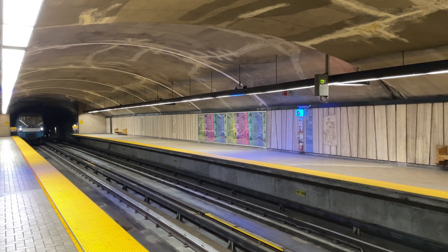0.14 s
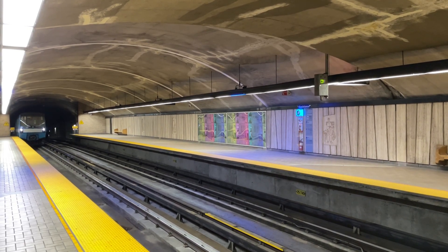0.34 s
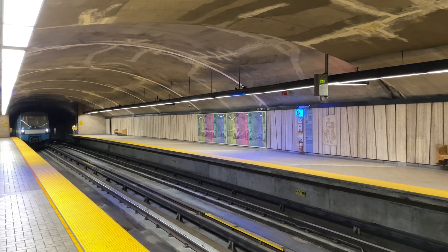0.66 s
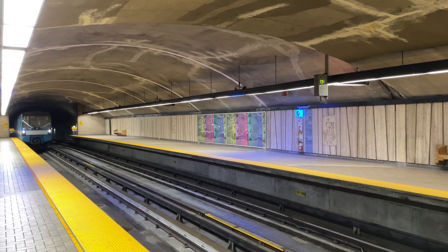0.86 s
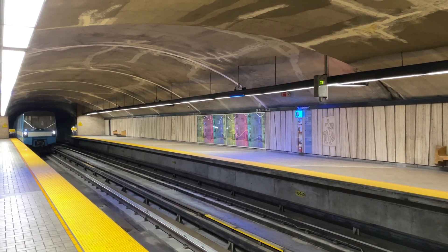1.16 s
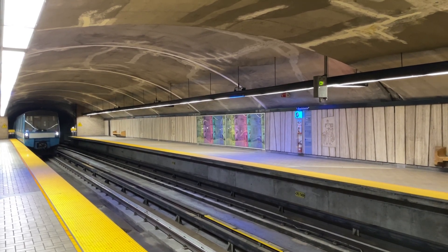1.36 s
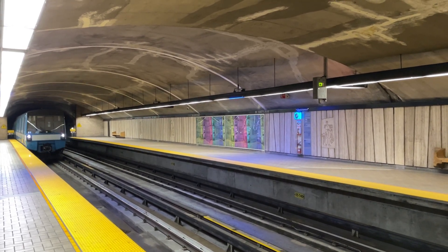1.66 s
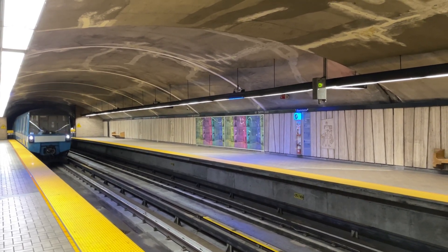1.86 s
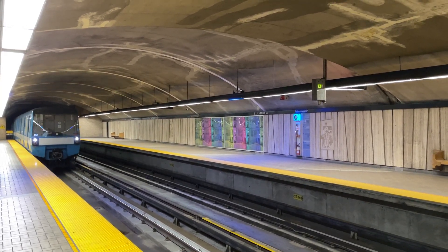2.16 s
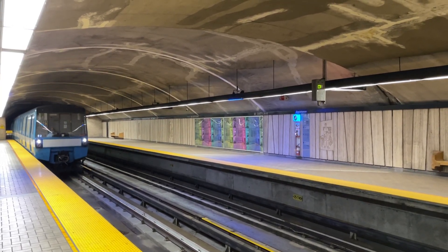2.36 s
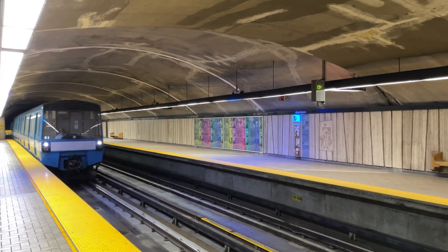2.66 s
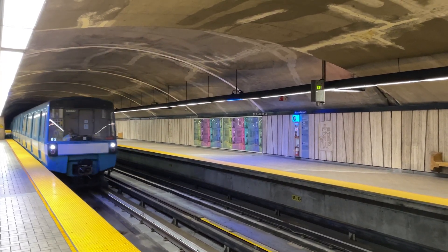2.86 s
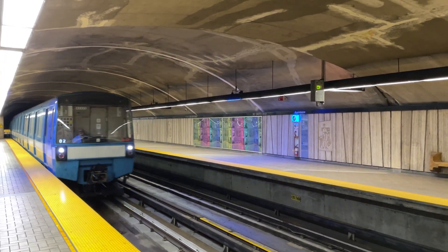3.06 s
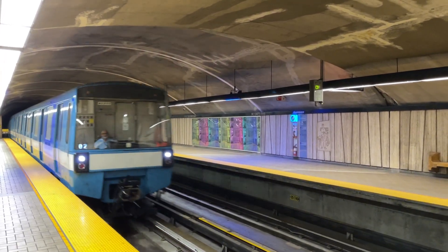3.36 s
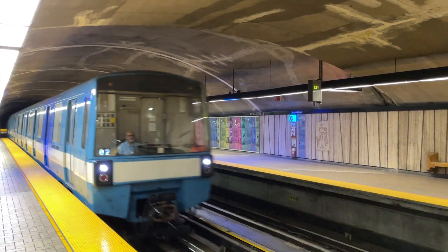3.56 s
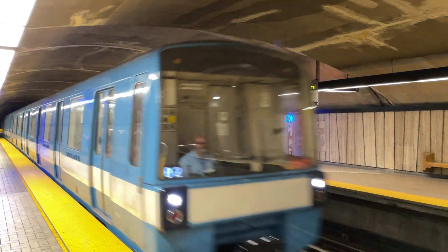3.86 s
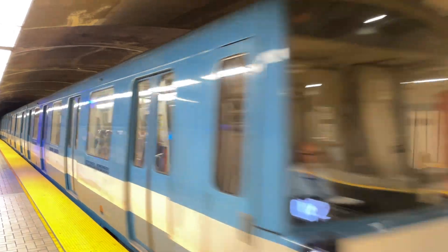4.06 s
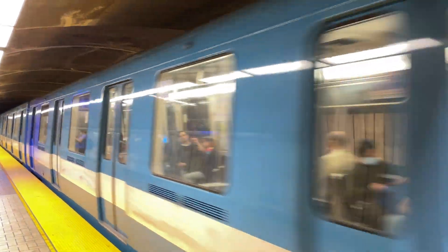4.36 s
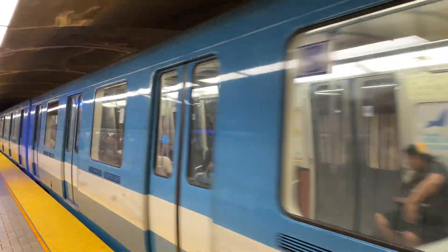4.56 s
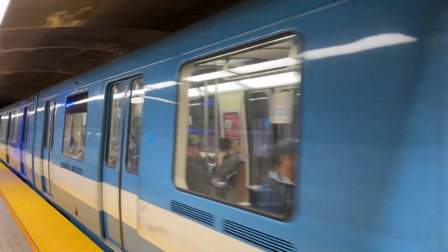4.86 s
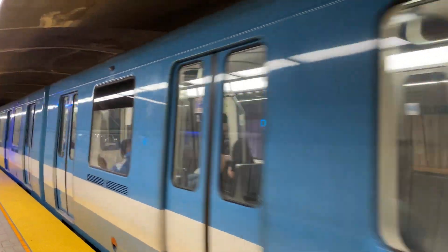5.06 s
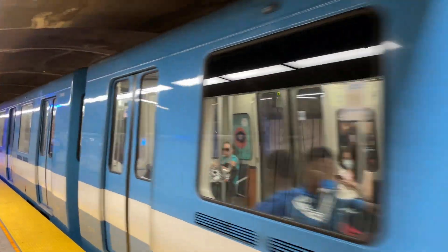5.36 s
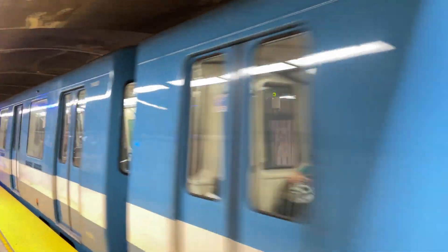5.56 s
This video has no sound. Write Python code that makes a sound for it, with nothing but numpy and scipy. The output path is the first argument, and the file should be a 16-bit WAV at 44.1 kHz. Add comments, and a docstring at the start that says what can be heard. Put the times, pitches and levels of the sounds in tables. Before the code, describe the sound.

A rubber-tyred metro train runs into a vaulted underground station, heard in stereo from the platform edge. From 0 s a loud, steady tyre roar and low rumble boom out of the tunnel, opening slightly by 0.9 s as the train emerges. Reverberant resonances colour it, and brief tonal swells and low surges make it uneven through about 3.6 s. A blurred gear note near 400 Hz slowly sinks and recedes around 3 s, beside a lower tyre hum and faint motor harmonics. Short, faint rail singing appears now and then. Sliding contact shoes hiss, their sizzle brightening until about 4.3 s. Near 3.9 s the nose passes: car bodies screen the distant roar, slipstream gently buffets the microphone, and a hollow resonance rises and fades. Soft bogie booms pass at 3.85, 4.5 and, strongest, 5.3 s, with slight floor shake. The train is still rolling at the end.

```python
"""Tyre roar booms out of a tunnel over singing gears: a rubber-tyred metro train runs into a vaulted station.
Heard from the platform edge, coloured noise makes the roar, and gliding narrow bands make the hall's resonances,
the slowly falling gear note and the faint drive hum. The collector shoes hiss ever brighter as they near.
Around 4 s the car bodies screen the far roar and their slipstream brushes the microphone; the last of three
bogies booms past at 5.3 s."""
import sys
import numpy as np
from scipy import signal
from scipy.fft import next_fast_len
from scipy.io import wavfile
from scipy.ndimage import uniform_filter1d

SR = 44100
rng = np.random.default_rng(int(sys.argv[2]) if len(sys.argv) > 2 else 0)


def persist_wave(psi):
    """Save psi, clipped to +-1, as 16-bit WAV."""
    counts = np.round(np.clip(psi, -1, 1) * 32767).astype(np.int16)
    wavfile.write(sys.argv[1], SR, np.atleast_2d(counts).T)


N = 251811
TIME = np.arange(N) / SR
FREQS = np.maximum(np.arange(N // 2 + 1) * SR / N, 1)

# Bogies that roll by right below the platform edge.
# Each row: time in seconds, boom in dB, floor shake in dB, spread of the bell-shaped swell in seconds.
BOGIES = [(3.85, -27.5, -32, 0.083), (4.5, -32, -35, 0.14), (5.332, -23.5, -29, 0.1)]
BRIGHTEST_S = 4.33   # the sizzle stops brightening and the rising hollow resonance is loudest
CHANGES_PER_S = 7   # random level changes of tyres and slipstream


def from_db(db):
    """Decibels to gain."""
    return 10 ** (np.asarray(db) / 20)


def over_pitch(rows):
    """Each column of a spectrum table, at every frequency."""
    hz, *columns = np.transpose(rows)
    return [np.interp(np.log(FREQS), np.log(hz), column) for column in columns]


def stage(middle_s, length_s):
    """A smooth change from 0 to 1."""
    return .5 + .5 * np.sin(np.pi * np.clip((TIME - middle_s) / length_s, -.5, .5))


def swell(at_s, spread_s):
    """A bell-shaped rise and fall of height 1."""
    return np.exp(-.5 * ((TIME - at_s) / spread_s) ** 2)


def drift(rate):
    """Slow chance of spread 1 at its knots, with `rate` knots a second."""
    knots = rng.standard_normal(2000)
    return np.interp(TIME * rate, np.arange(len(knots)), knots)


def port_mix(focus):
    """How much shared and private sound each microphone port takes; focus 1 is ahead, 0 is from all around."""
    # Each row: frequency in Hz, likeness 0-1 at full focus, left minus right in dB, left's lead in radians.
    port_rows = [(80, .98, -.4, 0), (125, .97, -.8, .03), (175, .92, -.7, .08), (330, .8, 0, .25),
                 (600, .4, 1.6, .45), (1200, .41, 1.5, .1), (1900, .24, 2.3, 0), (3100, .48, 3.6, .7),
                 (4400, .57, 3.4, .15), (5100, .49, 4.2, .6), (6100, .65, 2.2, -.3), (7000, .72, 1.5, -1.5),
                 (7900, .98, 0, -2.9), (8600, .98, 0, -3.4), (9800, .7, 0, -4.7), (11200, .85, 0, -6.28),
                 (13500, .75, 0, -7.6)]
    alike, pan_db, lead = over_pitch(port_rows)
    alike = np.clip(focus * alike, 0, .99)
    sides = np.array([[.5], [-.5]])   # left, right
    port = from_db(sides * pan_db) * np.exp(1j * sides * lead)
    return port * np.sqrt(alike), port * np.sqrt(1 - alike)


def hall_noise(gain, ports):
    """Reverberant stereo noise of a given colour, as an analytic signal with unit power in the middle."""
    size = next_fast_len(N)
    bins = np.minimum(np.arange(size // 2) * N // size, N // 2)
    white = rng.standard_normal((3, size // 2)) + 1j * rng.standard_normal((3, size // 2))
    shared, private = ports
    spectrum = gain[bins] * (shared[:, bins] * white[0] + private[:, bins] * white[1:])
    noise = np.fft.ifft(spectrum, size)[:, :N]
    return noise / np.std(noise.real.mean(axis=0))


def broadband(spectrum, ports):
    """Hall noise that follows a spectrum table and falls away steeply beyond its ends."""
    low_hz, high_hz = spectrum[0][0], spectrum[-1][0]
    ends = np.minimum(1, np.minimum(FREQS / low_hz, high_hz / FREQS)) ** 4
    return hall_noise(ends * from_db(over_pitch(spectrum)[0]), ports).real


def resonance(hz, width_hz):
    """Gain of a resonance, down to a third at width_hz to either side."""
    return 1 / (1 + ((FREQS - hz) / width_hz) ** 2 * 2)


def steadied(x, seconds, share):
    """Even out a share of the slow swells of a sound."""
    power = uniform_filter1d(np.mean(x ** 2, axis=0), max(int(seconds * SR), 1))
    relative_power = np.maximum(power / power.mean(), 1e-6)
    return x * relative_power ** (-np.clip(share, 0, 1) / 2)


def gliding_band(centre_hz, offset_hz, width_hz, ports):
    """A narrow band of hall noise whose pitch slides by a changing offset."""
    glide = np.exp(2j * np.pi * np.cumsum(offset_hz) / SR)
    return (hall_noise(resonance(centre_hz, width_hz), ports) * glide).real


def smeared_note(hz, ports, width_hz):
    """A tone smeared by the hall: a narrow band that glides with the pitch, held at a steady level."""
    note = gliding_band(hz.mean(), hz - hz.mean(), width_hz, ports)
    return steadied(note, seconds=0.21, share=1.0)


def clean_note(hz, wander_hz, waver_db):
    """One near source sings a line that wanders and wavers; the hall shifts its phase at each port."""
    phase = 2 * np.pi * np.cumsum(hz + wander_hz * drift(rate=9)) / SR
    at_ports = phase + 0.39 * np.array([drift(rate=5), drift(rate=5)])
    return np.sqrt(2) * from_db(waver_db * drift(rate=6.16)) * np.cos(at_ports)


def narrow_swells(rows, wander_hz):
    """Wandering tones that each rise and fall once."""
    return sum(from_db(level_db) * swell(at, spread_s) * clean_note(hz, wander_hz, waver_db=2)
               for at, hz, level_db, spread_s in rows)


def tyres(ports, arrived):
    """Many wheels roll: the underbody shakes and the casings drum, each varying a little at random."""
    # Underbody rumble, then tyre drumming. Each row: frequency in Hz, relative level in dB per Hz.
    rumble_spectrum = [(15, -28), (30, -20), (45, -4), (65, 0.5), (90, 2), (120, -4), (180, -10),
                       (400, -67)]
    drum_spectrum = [(50, -43), (90, -8.5), (130, -0.5), (200, -2.5), (300, -3), (400, -11.5), (600, -17.5),
                     (1200, -63.5)]
    # level far off, change alongside, random variation
    rumble_db = -30 + 0.9 * arrived + 1 * drift(CHANGES_PER_S)
    drum_db = -23.5 - 2 * arrived + 0.6 * drift(CHANGES_PER_S)
    rumble = from_db(rumble_db) * steadied(broadband(rumble_spectrum, ports), seconds=0.19, share=1.0)
    drum = from_db(drum_db) * steadied(broadband(drum_spectrum, ports), seconds=0.17, share=0.98)
    return rumble + drum


def early_echoes(x, arrived):
    """Floor and wall echo paths lengthen as the train nears, so faint ripples slide down the spectrum."""
    # Each row: delay in ms with the train far off, delay in ms with it alongside, level in dB.
    echo_rows = [(4.1, 5.5, -31.5), (8.3, 11, -17.5), (17, 21, -20)]
    out = x
    for far_ms, near_ms, echo_db in echo_rows:
        late_s = (far_ms + (near_ms - far_ms) * arrived) / 1000
        out = out + from_db(echo_db) * np.array([np.interp(TIME - late_s, TIME, side) for side in x])
    return out


def treads(ports, arrived, emerged, screened):
    """Tread roar comes down the hall at first, then more and more from all along the platform gap."""
    # Roar from ahead, then out of the gap between car and platform.
    # Each row: frequency in Hz, relative level in dB per Hz.
    roar_spectrum = [(120, -28), (250, -11), (370, 1.5), (490, 0), (570, -1.5), (680, 0), (950, -2.5),
                     (1150, -4), (1400, -7), (1750, -9.5), (2100, -12.5), (2800, -18.5), (4000, -33),
                     (8000, -66)]
    gap_spectrum = [(200, 1), (400, 2), (550, 4), (700, 3.5), (900, 6), (1150, 0), (1500, 3.5),
                    (1850, -3.5), (2200, -5), (3000, -21), (5000, -44)]
    # level from the tunnel, gain out of it, loss behind the car bodies
    roar_db = -21 + 0.91 * emerged - 1.84 * screened
    ahead = steadied(broadband(roar_spectrum, ports), seconds=0.17, share=0.39)
    beside = steadied(broadband(gap_spectrum, port_mix(focus=0.078)), seconds=0.14, share=.5)
    beside_share = np.clip(0.26 * arrived ** 2, 0, 1)
    roar = np.sqrt(1 - beside_share) * ahead + np.sqrt(beside_share) * beside
    flutter_db = 0.17 * drift(rate=24)   # the running surface is not quite even
    return from_db(roar_db + flutter_db) * early_echoes(roar, arrived)


def vault(ports, in_hall, screened):
    """Rolling noise rings the tunnel's, then the hall's sliding resonances, until the car bodies screen them."""
    # Each row: frequency in Hz at mid-run, glide in Hz per s, width in Hz, then levels in dB before the
    # common trim: train in the tunnel, out in the hall, alongside.
    resonances = [(120, -7, 44, -29, -30, -41), (155, -9, 44, -27, -35, -41.5),
                  (267, 0, 42, -31, -33.5, -31), (442, 0, 40, -28, -41, -40),
                  (474, -5, 52, -30, -30, -37.5), (640, -5, 47, -34, -32.5, -36),
                  (734, -5, 46, -28.5, -29.5, -36), (778, -36, 83, -30, -32.5, -36),
                  (922, 10, 56, -34, -40, -38.5), (1265, -28, 98, -33, -36, -44)]
    trim_db = -2.5
    out = 0
    for hz, glide_hz_per_s, width_hz, tunnel_db, hall_db, near_db in resonances:
        band = gliding_band(hz, glide_hz_per_s * (TIME - TIME.mean()), width_hz, ports)
        ringing = steadied(band, seconds=0.23, share=0.53)
        far_db = tunnel_db + (hall_db - tunnel_db) * in_hall
        level_db = far_db + (near_db - far_db) * screened + trim_db
        out = out + from_db(level_db) * ringing
    return out


def gears(ports):
    """All bogies' gears mesh at nearly one rate, sinking as the train brakes; the nearest stand out as a line."""
    hz = 398.6 - 9.7 * TIME   # falls by 9.7 Hz per s
    faded = stage(middle_s=2.9, length_s=1)   # the gear note recedes
    line = from_db(-32.5 - 12 * faded) * clean_note(hz, wander_hz=4.99, waver_db=2)
    many = from_db(-30.5 - 2 * faded) * smeared_note(hz, ports, width_hz=35)
    return line + many


def tyre_hum(ports, in_hall, screened, second_car):
    """Turning tyres hum, louder in the hall and sinking with the speed; the nearest stand out as a line."""
    hz = 266.3 - 3.2 * TIME   # falls by 3.2 Hz per s
    # level, gain in the hall, loss behind the car bodies, gain from the second car
    hum_db = -33.5 + 2.5 * in_hall - 2.5 * screened + 5 * second_car
    line_db = -37 + 3.5 * in_hall - 5.5 * screened
    many = from_db(hum_db) * smeared_note(hz, ports, width_hz=32)
    return many + from_db(line_db) * clean_note(hz, wander_hz=5.02, waver_db=2)


def drive(ports):
    """The switched motor current hums on a few harmonics."""
    # Each row: multiple of the base pitch, level in dB.
    partials = [(2, -43.5), (3, -44.5), (4, -50), (5, -48)]
    hz = 368.3 - .9 * TIME   # falls by 0.9 Hz per s
    return sum(from_db(level_db) * smeared_note(k * hz, ports, width_hz=5.5 * k) for k, level_db in partials)


def shoes(ports, emerged, screened, second_car):
    """Shoes slide on the steel rails; the air lets their finest sizzle through only from close by."""
    # Hiss, sizzle and its finest part. Each row: frequency in Hz, relative level in dB per Hz.
    hiss_spectrum = [(1000, -23), (2000, -2), (3000, 3), (4000, 1), (5000, -0.5), (6000, -4), (7500, -11),
                     (10000, -98), (14000, -47)]
    sizzle_spectrum = [(4000, -22), (6500, -3), (7800, 3), (9000, .3), (10200, -2.5), (11500, -9.5),
                       (13000, -20)]
    fine_spectrum = [(8800, -8), (9400, 2), (11200, -.5), (14000, -11)]
    speed_m_per_s = 17.3
    air_db_per_m, fine_air_db_per_m = -0.1072, -0.09   # the finest part loses both
    distance_m = speed_m_per_s * np.maximum(BRIGHTEST_S - TIME, 0)
    at_bogie = sum(swell(at, spread_s) for at, _, _, spread_s in BOGIES)

    # level from the tunnel, gain out of it, then loss behind the car bodies and gain as a bogie passes
    hiss_db = -37.1 + 1.72 * emerged + screened * (-0.7 + 0.2 * at_bogie)
    # level close by, loss in the tunnel, loss in the air
    sizzle_db = -50 - 1 * (1 - emerged) + air_db_per_m * distance_m
    sizzle_db = sizzle_db + screened * (-3.5 + 0.5 * at_bogie) + 1 * second_car
    contact_db = 0.56 * drift(rate=14)   # the shoes press unevenly

    hiss = from_db(hiss_db) * broadband(hiss_spectrum, ports)
    fine = from_db(-1.5 + fine_air_db_per_m * distance_m) * broadband(fine_spectrum, ports)
    sizzle = from_db(sizzle_db) * (broadband(sizzle_spectrum, ports) + fine)
    return from_db(contact_db + 0.5 * second_car) * (hiss + sizzle)


def roar_swells():
    """The roar swells briefly at one pitch after another, each a wandering tone; the last, near 66 Hz at 5.35
    s, is the floor shaking as the last bogie passes."""
    # Each row: time in seconds, pitch in Hz, level in dB, spread of the swell in seconds.
    swell_rows = [(.17, 183.7, -28.5, .08), (.7, 390, -25.5, 0.04), (.88, 444, -28, 0.071),
                  (1.0, 200, -25.5, .07), (1.38, 127.7, -26, 0.075), (1.73, 259.4, -25.5, 0.037),
                  (2.12, 259, -25.5, 0.085), (2.21, 379, -28, .07), (2.53, 249.6, -24, 0.049),
                  (3.03, 132.5, -25.5, 0.079), (3.54, 252.3, -28.5, 0.12), (5.35, 66.2, -28, .06)]
    return narrow_swells(swell_rows, wander_hz=3.06)


def surges(ports):
    """The low roar surges briefly; each surge lifts it over a broad band."""
    # Each row: time in seconds, level in dB, spread of the swell in seconds.
    surge_rows = [(0.166, -26.5, 0.022), (.48, -24, .02), (1.003, -28, 0.029), (1.39, -23, 0.033),
                  (1.73, -22.5, .025), (2.128, -24, 0.03), (2.982, -25, 0.042), (3.562, -26, 0.027),
                  (5.25, -30, 0.025)]
    # Each row: frequency in Hz, relative level in dB per Hz.
    surge_spectrum = [(70, -2), (130, 2), (260, 2), (480, -1), (900, -9), (1400, -28)]
    level = sum(from_db(level_db) * swell(at, spread_s) for at, level_db, spread_s in surge_rows)
    return level * steadied(broadband(surge_spectrum, ports), seconds=0.071, share=.9)


def guide_rails():
    """The guide rails sing faintly under braking, in short wandering tones; the two 729 Hz rows are brief
    swells of the drive hum's second harmonic."""
    # Each row: time in seconds, pitch in Hz, level in dB, spread of the swell in seconds.
    singing_rows = [(.9, 1340, -38, .18), (1.0, 900, -30, .09), (2.19, 1386, -33.5, 0.088),
                    (2.64, 1001, -32.5, 0.13), (3.85, 729, -32, .06), (4.89, 729, -29.5, .08)]
    return narrow_swells(singing_rows, wander_hz=4)


def hollow(ports):
    """The first car closes the hollow under the platform edge, so its resonance slides upwards."""
    hz = 540 + 95 * (TIME - BRIGHTEST_S)   # rises by 95 Hz per s
    return from_db(-32.5) * swell(BRIGHTEST_S, spread_s=0.51) * smeared_note(hz, ports, width_hz=42)


def draught(screened):
    """As the nose goes by, the slipstream begins to buffet each microphone port on its own."""
    # Each row: frequency in Hz, relative level in dB per Hz.
    draught_spectrum = [(25, -12), (50, -5), (85, 4), (130, -5), (180, -10), (300, -19)]
    level_db = -38 + 1 * drift(CHANGES_PER_S)   # gusting
    return from_db(level_db) * screened * broadband(draught_spectrum, port_mix(focus=0))


def bogies(ports):
    """Each near bogie booms as it rolls past and shakes the platform after it."""
    # Boom, then platform shake. Each row: frequency in Hz, relative level in dB per Hz.
    boom_spectrum = [(70, -8), (115, -9), (170, 1), (215, 1), (300, 0), (380, -7), (700, -32)]
    shake_spectrum = [(30, -18), (45, -12), (63, -4), (80, 5), (110, -12)]
    shake_lag_s = 0.028   # the floor shakes most just after the bogie has passed
    boom = sum(from_db(boom_db) * swell(at, spread_s) for at, boom_db, _, spread_s in BOGIES)
    shake = sum(from_db(shake_db) * swell(at + shake_lag_s, spread_s) for at, _, shake_db, spread_s in BOGIES)
    return sum(level * steadied(broadband(spectrum, ports), seconds=0.16, share=0.83)
               for level, spectrum in ((boom, boom_spectrum), (shake, shake_spectrum)))


def scene():
    """The whole train as heard from the platform."""
    # How far the train has come alongside. Each row: time in seconds, share 0-1.
    arrival_rows = [(0, 0), (2, 0.16), (3.75, 0.46), (4.15, 1), (5.7, 0.89)]
    arrived = np.interp(TIME, *np.transpose(arrival_rows))
    emerged = stage(middle_s=0.59, length_s=0.54)   # the first shoes clear the tunnel mouth
    in_hall = stage(middle_s=1.57, length_s=2.2)   # the first car comes out under the vault
    screened = stage(middle_s=3.91, length_s=0.62)   # the car bodies come to screen the far sound
    second_car = stage(middle_s=5.45, length_s=.3)   # its shoes and tyres draw near
    ports = port_mix(focus=1)

    rolling = tyres(ports, arrived) + treads(ports, arrived, emerged, screened) + vault(ports, in_hall, screened)
    notes = gears(ports) + tyre_hum(ports, in_hall, screened, second_car) + drive(ports)
    hissing = shoes(ports, emerged, screened, second_car)
    brief = roar_swells() + surges(ports) + guide_rails()
    passing = hollow(ports) + draught(screened) + bogies(ports)
    return rolling + notes + hissing + brief + passing


def record(dry):
    """The sound opens without a click and the top is cut steeply at 13.9 kHz."""
    top_cut = signal.ellip(10, .1, 80, 13900, fs=SR, output="sos")
    fade_in = np.minimum(TIME / .004, 1)
    return signal.sosfilt(top_cut, dry * fade_in)


dry = scene()
out = record(dry)
persist_wave(out)
```